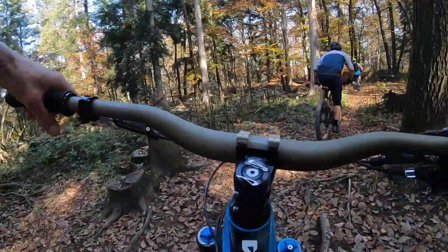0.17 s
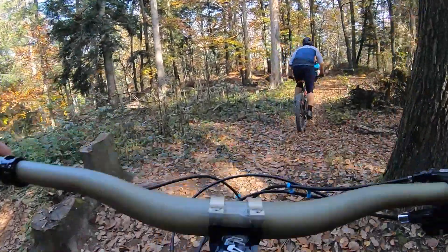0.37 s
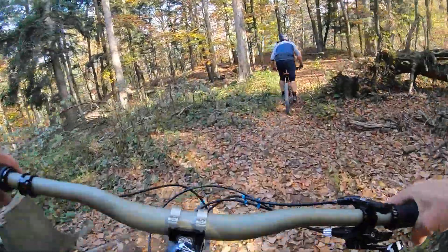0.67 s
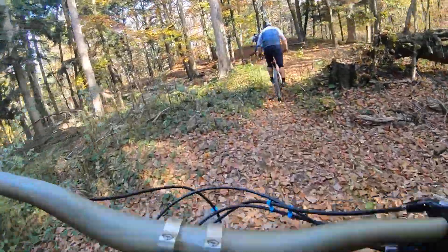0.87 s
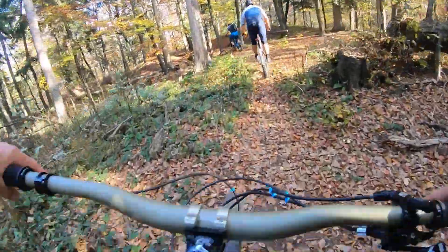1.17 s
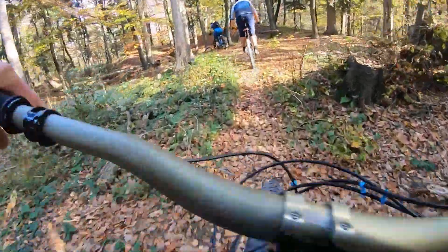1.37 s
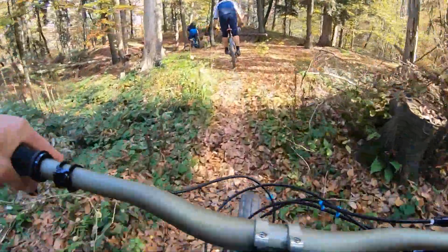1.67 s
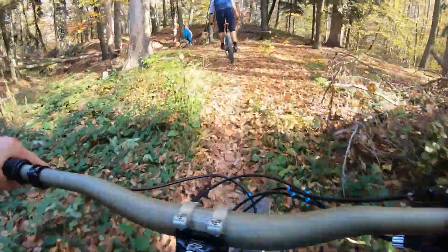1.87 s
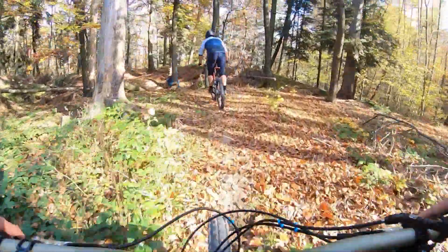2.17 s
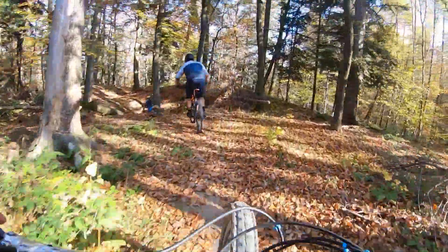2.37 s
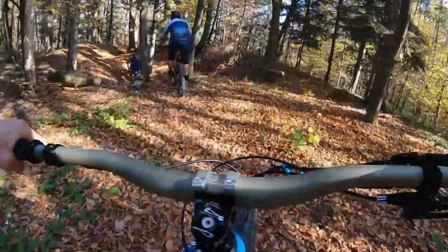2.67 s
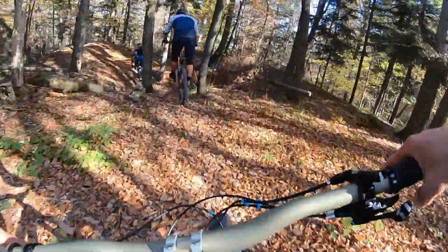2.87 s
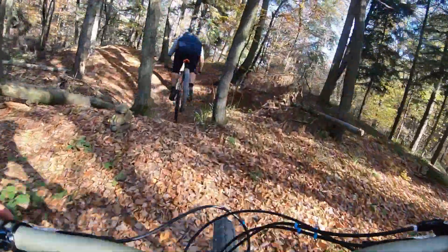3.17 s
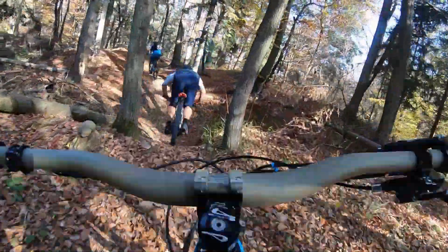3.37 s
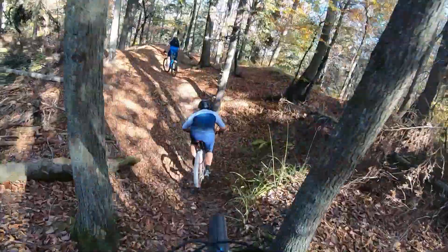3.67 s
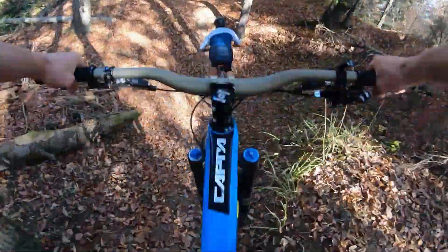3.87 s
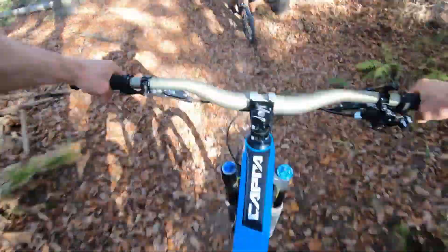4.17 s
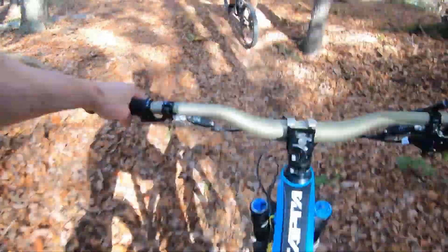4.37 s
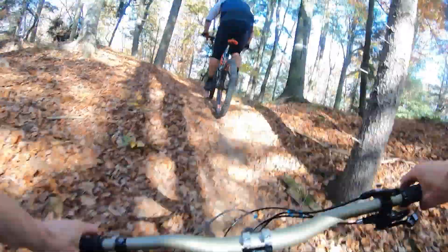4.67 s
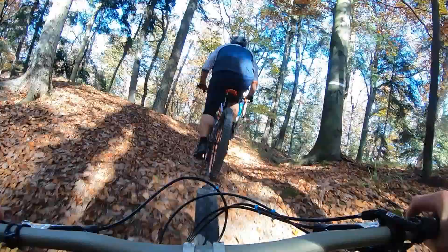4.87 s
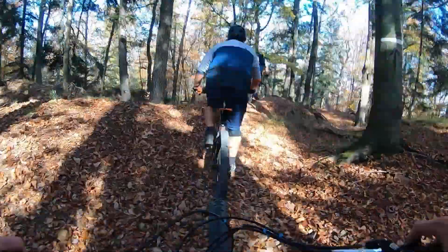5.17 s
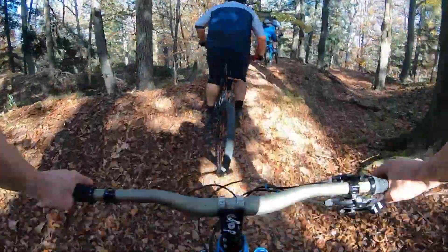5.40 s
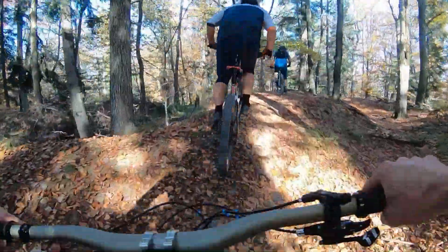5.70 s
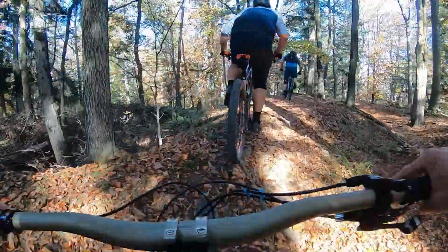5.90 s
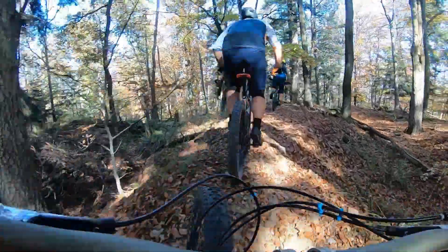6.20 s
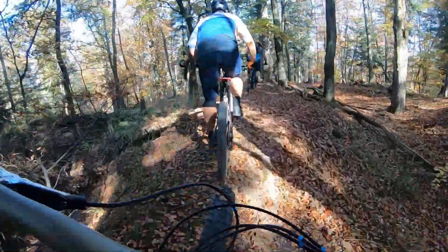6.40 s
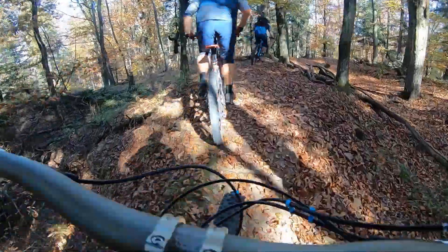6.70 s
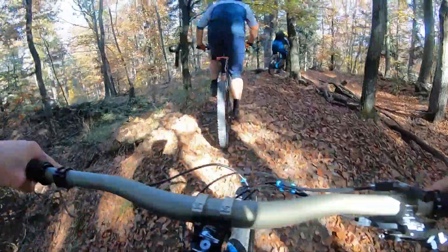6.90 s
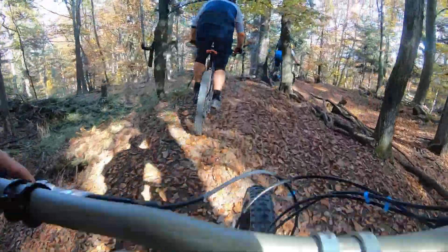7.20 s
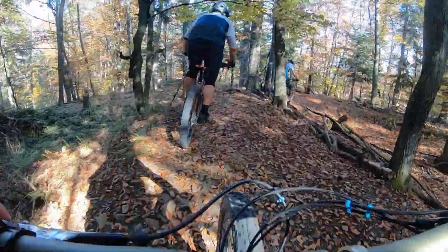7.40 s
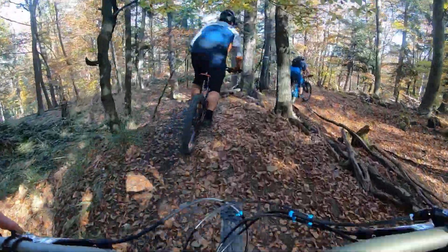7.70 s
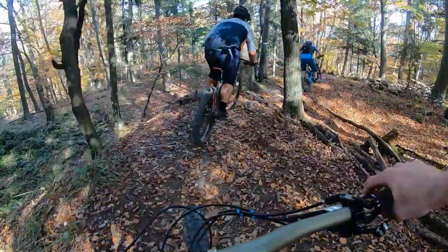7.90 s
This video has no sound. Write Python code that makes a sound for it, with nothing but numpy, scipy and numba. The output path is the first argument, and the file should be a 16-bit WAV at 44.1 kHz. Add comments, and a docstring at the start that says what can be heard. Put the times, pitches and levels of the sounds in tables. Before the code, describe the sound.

Heard close from the rider's chest, a mountain bike rolls slowly through dry forest leaves, crunching in uneven clumps over a low frame rumble. Knocks and metallic clacks come singly. Midway it speeds through a dip while the freewheel buzzes brightly, then the buzz slows into separate ticks. Leaf crunch, thuds and rattles continue uphill, with low wind gusts, and the buzz returns at the very end.

```python
"""Dry leaves crunch under a mountain bike that rolls, coasts through a dip and climbs again, heard at the rider's chest.
Leaves are clumps of tiny noise bursts over a smooth rustle; the frame rumbles and the mount hums under its bumps.
Knocks, steel clacks, scrapes and ringing jolts land one by one. While the pedals rest, pawl drops excite the hub's
resonances into a buzz that ends in single ticks. Wind buffets the two microphone ports as low, gusting noise."""
import sys
import numpy as np
from scipy import signal
from scipy.fft import rfft, irfft, next_fast_len
from scipy.io import wavfile
from scipy.ndimage import uniform_filter1d, map_coordinates
from numba import njit

SR = 44100
rng = np.random.default_rng(int(sys.argv[2]) if len(sys.argv) > 2 else 0)


def store_pcm(level_fs):
    """Save levels as 16-bit WAV."""
    pcm = np.round(np.clip(level_fs, -1, 1) * 32767).astype(np.int16)
    wavfile.write(sys.argv[1], SR, np.atleast_2d(pcm).T)


N = 355005
T = np.arange(N) / SR
CRUISE_M_S = 3  # speed at which the rolling sounds have their base level
MODE_DRIFT = .022  # rms share by which hub and spoke pitches wander

# resonances of hub shell and spokes: f/Hz, width/Hz, level/dB
HUB_MODES = [(1300, 100, 0), (1570, 120, -2), (2170, 220, 6), (2600, 300, -0.5), (3850, 250, -1.5),
             (4440, 170, 0.5), (5950, 200, -2), (7450, 280, -2), (9470, 700, -5)]
# colour of the bare pawl ticks: f/Hz, level/dB
HUB_TONE = [(600, -25), (1200, -44), (2400, 15.5), (4900, 7.5), (6500, 11.5), (9800, 14.5), (11000, 3.5),
            (14000, 2), (16000, -48)]


def amp(db):
    """Decibels to gain."""
    return 10 ** (np.asarray(db) / 20)


def unit(x):
    """Scale to rms 1."""
    return x / np.sqrt(np.mean(x ** 2))


def curves(table):
    """Each column of a table after the first as a curve in time."""
    s, *columns = np.transpose(table)
    return [np.interp(T, s, column) for column in columns]


def tint(x, spectrum):
    """Colour a sound with (f/Hz, level/dB) points, joined along log frequency."""
    hz, db = np.transpose(spectrum)
    size = next_fast_len(x.shape[-1])
    f = np.maximum(np.arange(size // 2 + 1) * SR / size, 1)
    gain = amp(np.interp(np.log(f), np.log(hz), db))
    return irfft(rfft(x, size) * gain, size)[..., :x.shape[-1]]


def resonate(x, hz, width):
    """One resonance, gain 1 at its centre."""
    b, a = signal.iirpeak(min(hz, SR / 2 - 1), hz / width, fs=SR)
    return signal.lfilter(b, a, x)


def ring(x, modes):
    """A body as parallel resonances of (f/Hz, width/Hz, level/dB)."""
    return sum(amp(db) * resonate(x, hz, width) for hz, width, db in modes)


@njit
def sweep(x, hz, width):
    """One resonance whose centre moves, gain 1 at the centre."""
    y, band, low = np.empty(len(x)), 0., 0.
    for i in range(len(x)):
        g, k = np.tan(np.pi * hz[i] / SR), width / hz[i]
        v = (band + g * (x[i] - low)) / (1 + g * (g + k))
        band, low, y[i] = 2 * v - band, low + 2 * g * v, k * v
    return y


def walk(rate):
    """Random curve of rms 1 that heads for a new value rate times a second."""
    steps = np.cumsum(np.full(N, rate / SR))
    return unit(map_coordinates(rng.standard_normal(4096), [steps], order=1, mode="wrap"))


def swells(events, attack_s, release_s):
    """Events of (t/s, length/s, sizes) rise, hold and fall; one curve for each kind of size."""
    total = 0
    for s, length, *sizes in events:
        corners = [s - attack_s, s, s + length, s + length + release_s]
        total = total + np.outer(sizes, np.interp(T, corners, [0, 1, 1, 0]))
    return total


def doublings(speed):
    """How many times the speed has doubled from cruising."""
    return np.log2(speed / CRUISE_M_S)


def ports(pair):
    """Two unrelated sounds as mid and side at the two ports, narrow in the bass."""
    # stereo width: f/Hz, side minus mid/dB
    side_width = [(100, -43), (350, -19), (700, -3), (1200, -1), (2400, -9.5), (4400, -9), (8000, 0),
                  (15000, 0)]
    side = tint(pair[1], side_width)
    return np.array([pair[0] + side, pair[0] - side])


def pan(db):
    """Left and right gains for a left minus right level in dB."""
    return amp(np.array([db, -db]).reshape(2, -1) / 2)


def add(out, s, sound):
    """Mix a short sound in at time s."""
    i = max(int(s * SR), 0)
    out[:, i:i + sound.shape[1]] += sound[:, :N - i]


def crackle(rate, spread_db, t60, low_hz, high_hz, width_share, patchy_db, count=12):
    """Tiny fractures, most faint and a few strong; each of count bands has its own bursts and flurries."""
    out, n = 0, int(rate * N / SR / count)
    for hz in np.geomspace(low_hz, high_hz, count):
        at = rng.integers(0, N, n)
        flurry_db = patchy_db * np.interp(at, np.linspace(0, N, 160), rng.standard_normal(160))
        sizes = amp(np.minimum(spread_db * rng.exponential(size=n) + flurry_db, 13))
        hits = np.bincount(at, sizes ** 2, N) + 1e-18
        # each hit's power falls by 60 dB in t60 seconds
        power = signal.lfilter([1], [1, -np.exp(-2 * np.log(1000) / t60 / SR)], hits)
        bursts = np.sqrt(power) * rng.standard_normal((2, N))
        out = out + resonate(bursts, hz, hz * width_share)
    return unit(out)


def wind(speed):
    """Eddies buffet each port on its own; stronger gusts shed finer eddies."""
    # gusts hitting the ports: t/s, length/s, level above the steady airflow/dB, added left minus right/dB
    gusts = [(0, 0.039, 12.5, -3), (1.05, 0.11, 7, 4), (1.42, 0.3, 12, 1), (1.86, 0.23, 8, 5),
             (2.33, 0.32, 10, 0), (3.02, 0.092, 12, 1), (3.52, 0.45, 6.5, -3.5), (4.2, 0.61, 5.5, -1),
             (4.95, 0.25, 7, -1.5), (5.26, 0.053, 5.5, -3.5), (6.33, 0.22, 4, -4.5), (7.22, 0.19, 4.5, 7),
             (7.47, 0.17, 4, -8.5), (7.93, 0.069, 10, -7.5)]
    # colour of the steady buffeting: f/Hz, level/dB
    wind_tone = [(15, 8.5), (30, 2.5), (60, 6), (110, 1.5), (150, -5.5), (250, -21), (500, -39),
                 (1500, -57)]
    # colour of the fine eddies: f/Hz, level/dB
    gust_tone = [(60, -32), (150, -2), (260, -1), (450, -11), (900, -26.5), (2500, -82)]
    gust_db, push_db = swells(gusts, attack_s=0.13, release_s=0.11)
    level_db = -22.5 + 6 * doublings(speed) + gust_db
    eddies = rng.standard_normal((2, N)) * amp(3.23 * np.array([walk(24), walk(24)]))
    buffet = unit(tint(eddies, wind_tone)) * amp(level_db)
    flutter = unit(tint(eddies, gust_tone)) * amp(1.45 * level_db - 10)  # gains more than the buffet in a gust
    return (buffet + flutter) * pan(-2 + push_db)


def rumble(speed, rough_db):
    """Level of the ground's shaking in dB: more with speed and in ruts, and always a little lumpy."""
    # wheels judder over rough patches: t/s, length/s, level above the rolling rumble/dB
    ruts = [(1.56, 0.043, 9), (2.05, 0.19, 6), (3.6, 0.071, 3.5), (5.65, 0.017, 7.5), (6.34, 0.025, 5),
            (7.47, 0.06, 4), (7.97, 0.048, 4)]
    rut_db, = swells(ruts, attack_s=0.023, release_s=0.007)
    lumps_db = 1 * walk(18)
    return -30 + 11.5 * doublings(speed) + rough_db + rut_db + lumps_db


def frame(level_db):
    """Small bumps thud through tyres and frame and rock the camera mount."""
    # colour of the thuds: f/Hz, level/dB
    frame_tone = [(60, 8.5), (130, -2), (230, 0), (320, -4), (450, -7), (620, -9.5), (900, -28),
                  (2000, -46), (5000, -63)]
    bumps = crackle(rate=380, spread_db=2.1, t60=0.014, low_hz=100, high_hz=900,
                    width_share=.8, patchy_db=1.5, count=4)
    bumps = bumps + amp(-20) * rng.standard_normal((2, N))
    thuds = unit(ports(unit(tint(bumps, frame_tone)))) * amp(level_db)
    mount_hz = 233.3 * (1 + .05 * walk(5.6))  # the strap tightens and slackens
    mount = unit(sweep(bumps[0], mount_hz, 27.)) * amp(0.8 * level_db - 15.5)
    return (thuds + mount) * pan(-3.2)


def jolts():
    """Jolts set the mount, the housing or a spoke ringing as decaying sines."""
    # jolts: t/s, f/Hz, level at the left port/dB, decay/s, share and sign of the swing at the right port
    hits = [(3.919, 1293, 6.5, 0.0054, -0.62), (5.055, 1320, -17, 0.013, 0.13),
            (5.088, 1280, -23.5, 0.022, 0.24), (6.822, 256, -20, 0.03, 1), (6.992, 239.5, -11, 0.023, 0.96)]
    out, t = np.zeros((2, N)), T[:8192]
    for s, hz, db, decay_s, right in hits:
        tone = np.sin(2 * np.pi * hz * t) * (1 - np.exp(-t / 0.00092)) * np.exp(-t / decay_s)
        add(out, s, amp(db) * tone * np.array([[1], [right]]))
    return out


def scrapes():
    """Rubbing surfaces catch and slip unevenly in one resonance."""
    # scrapes of grip, tyre and brake pad: t/s, length/s, level/dB, f/Hz, width/Hz, left minus right/dB
    rubs = [(0.002, 0.026, -25.5, 1760, 1200, 8), (0.696, 0.018, -39, 8300, 1800, -12),
            (1, 0.045, -31, 1500, 2000, 3), (1.15, 0.05, -32, 550, 497, 0),
            (4.246, 0.035, -21, 2250, 1200, 2), (4.319, 0.055, -23.5, 7440, 1396, -4),
            (5.012, 0.012, -23.5, 2500, 350, 2), (6.738, 0.033, -25.5, 1000, 1200, -1)]
    edge_s = 0.005
    out, t = np.zeros((2, N)), T[:8192]
    for s, length, db, hz, width, pan_db in rubs:
        slips = rng.standard_normal((2, len(t))) * (rng.random(len(t)) < 2500 / SR)  # about 2500 a second
        rub = unit(ports(resonate(resonate(slips, hz, width), hz, width)))
        contact = np.interp(t, [0, edge_s, length, length + edge_s], [0, 1, 1, 0])
        add(out, s, rub * contact * amp(db) * pan(pan_db))
    return out


def knocks():
    """A root thumps through the tyre while the wood gives one sharp crack and a short splintering tail."""
    # roots, twigs and knocks: t/s, thump level before trim/dB, thump f/Hz, snap level before trim/dB, snap f/Hz
    impacts = [(0.0015, -22, 394, -10.5, 1500), (0.0202, -26, 650, -17, 850),
               (0.0298, -36, 800, -19.5, 960), (0.3114, -30, 500, -23, 1400), (0.465, -26, 250, -38, 900),
               (0.555, -31, 460, -33, 1000), (0.981, -21, 300, -25, 900), (0.9911, -11.5, 376, -14.5, 1100),
               (1.114, -24, 610, -31, 1000), (1.161, -20, 420, -31, 800), (1.187, -18.5, 333, -43, 900),
               (1.333, -16.5, 187, -28, 1000), (1.963, -54, 450, -23, 2230), (2.046, -16.5, 250, -26, 1200),
               (2.091, -20, 307, -26, 1300), (2.135, -16.5, 316, -17, 1400),
               (2.4796, -24, 420, -15.5, 1660), (2.625, -20, 400, -17, 1400), (2.7943, -20, 474, -15, 2260),
               (2.9245, -8.5, 257, -23, 800), (3.2483, -20, 330, -26, 1400), (3.573, -21, 305, -23, 900),
               (4.181, -17, 393, -37, 1400), (4.225, -30, 328, -7.5, 1710), (4.2289, -33, 400, -8, 2410),
               (4.2426, -38, 410, -5, 2020), (4.261, -12.5, 190, -20, 2900), (4.633, -14, 332, -16, 900),
               (4.661, -8, 240, -14, 2000), (4.717, -15, 450, -22, 993), (4.826, -20, 645, -13, 1053),
               (4.864, -13.5, 280, -25, 1100), (4.92, -21, 315, -23, 800), (5.7058, -40, 500, -13, 1480),
               (6.1516, -21.5, 404, -12, 1630), (6.338, -17, 267, -23, 1500), (6.565, -18, 153, -44, 1200),
               (6.7415, -20, 453, -23, 1200), (6.758, -20, 500, -27, 1300), (6.846, -37, 400, -22, 1700),
               (6.992, -23, 600, -16, 900), (7.033, -15, 710, -20, 1100), (7.1198, -20, 503, -14, 1600),
               (7.46, -27, 323, -18, 1400), (7.824, -19, 366, -20, 1793)]
    thump_trim_db, snap_trim_db = 5.5, 8.0
    out, t = np.zeros((2, N)), T[:4096]
    crack_s, side_lag_s = .001, .00015
    crack = np.array([np.sinc((t - at) * SR) for at in (crack_s, crack_s + side_lag_s)])
    wood = signal.butter(4, 3400, fs=SR, output="sos")  # dulls the snap
    for s, thump_db, hz, snap_db, snap_hz in impacts:
        thump = np.sin(2 * np.pi * hz * t) * hz * t * np.exp(-hz * t / 0.37)  # swells and dies in about two cycles
        splinters = amp(-26) * rng.standard_normal((2, len(t)))
        blow = ports(crack + splinters) * np.exp(-t / .007)
        width = 1.4 * snap_hz
        snap = signal.sosfilt(wood, resonate(resonate(blow, snap_hz, width), snap_hz, width))
        thump = thump / np.abs(thump).max() * amp(thump_db + thump_trim_db)
        snap = snap / np.abs(snap).max() * amp(snap_db + snap_trim_db)
        add(out, s, thump + snap)
    return out


def clacks():
    """Steel meets steel in a few milliseconds of chatter, with a faint ring after it."""
    # chain and levers: t/s, level before trim/dB, 1-3.5 kHz body level before trim/dB, left minus right/dB
    strikes = [(0.0204, -10, -13, -11), (0.026, -12, -15, -17), (0.2397, -13.5, -11, 2),
               (0.6643, -27.5, 7, 5), (0.911, -1, -11, 5), (1.0562, -1.5, -11, 2), (3.919, -19.5, -9, -33),
               (5.054, -7, 0.5, 7), (5.085, -0.5, -4.5, 4), (6.6248, -5, -2.5, 4), (6.712, -1.5, -11, 0),
               (6.7422, -7, -1.5, 2), (6.768, -3, -7.5, 1.0), (6.8443, -3, -7, 4.5), (6.889, -9, -24, -1),
               (7.1745, -15, -1, -1)]
    # resonances of the steel parts: f/Hz, width/Hz, level/dB
    steel_modes = [(5000, 84, 14), (5720, 1130, 9.5), (7460, 47, 9), (8160, 220, 3), (9400, 520, -12),
                   (14500, 1100, -4.5)]
    level_trim_db, body_trim_db = -5.0, 5.0
    out, t = np.zeros((2, N)), T[:4096]
    chatter = np.exp(-(t / .0036) ** 4) + amp(-15) * np.exp(-t / .007)
    for s, level_db, body_db, pan_db in strikes:
        contacts = rng.standard_normal((2, len(t))) * chatter
        steel = unit(resonate(ring(contacts, steel_modes), 7500, 5900))
        body = unit(resonate(resonate(contacts, 3630, 2100), 1500, 1500))
        clack = ports(steel + amp(body_db + body_trim_db) * body) / np.abs(steel[0]).max()
        add(out, s, clack * amp(level_db + level_trim_db) * pan(pan_db))
    return out


def pawl_ticks(count=14):
    """As the cranks catch up, pawl drops tick one by one, slightly quickening, and leave a spoke ringing."""
    # ringing spoke; the pitch glides up as the next one takes the load: t/s, f/Hz
    spoke_pitch = [(5.28, 1310), (5.37, 1580)]
    start_s, gap_s, quicken_s = 5.151, .0405, .001
    k = np.arange(count)
    tick_s = start_s + k * gap_s - quicken_s * k ** 2 / 2
    drops = np.zeros(N)
    drops[(tick_s * SR).astype(int)] = amp(rng.standard_normal(count))
    contacts = signal.oaconvolve(drops, np.exp(-T[:1024] / .0022))[:N] * rng.standard_normal((2, N))
    ticks = ports(ring(contacts, HUB_MODES) + amp(-8) * tint(contacts, HUB_TONE))
    hz = curves(spoke_pitch)[0] * (1 + MODE_DRIFT * walk(30))
    pulses, width_hz = drops + 1e-18, 100.
    overtone = sweep(pulses, 2.76 * hz, width_hz)
    spoke = sweep(pulses, hz, width_hz) + amp(-6) * overtone
    return (amp(-27.5) * ticks + amp(-19.5) * spoke / np.abs(spoke).max()) * pan(2.7)


def freehub(speed):
    """Pawls drop over the ratchet teeth; each drop rattles the hub shell and spokes."""
    # resting pedals: t/s, length/s, level at cruising speed before trim/dB, fade by the end/dB
    coasts = [(3.509, 0.75, -25.5, 3), (4.003, 1.43, -29, -5), (7.867, 0.64, -23.5, 11)]
    pawls_per_m, release_s, trim_db = 38, 0.39, -2.0
    catch_up = 0.5  # share of the wheel's speed that the cranks regain by the end of a coast
    gain, slip = 0, 1
    for s, length, db, fade_db in coasts:
        progress = np.clip((T - s) / length, 0, 1)
        coasting = np.interp(T, [s, s + 0.0063, s + length - release_s, s + length], [0, 1, 1, 0])
        gain = gain + coasting * amp(db - fade_db * progress ** 2)
        slip = np.where(T > s, 1 - catch_up * progress ** 6, slip)
    rate = pawls_per_m * speed * slip
    turns = np.cumsum(rate * (1 + 0.022 * walk(40))) / SR  # pawl drops so far
    since_drop_s = turns % 1 / rate
    drops = np.exp(-since_drop_s / .004) + .4
    drops = drops / np.sqrt(uniform_filter1d(drops ** 2, size=2048))  # even loudness at any rate
    rattle, shell = drops * rng.standard_normal((2, N)), 0
    for hz, width, db in HUB_MODES:  # the turning wheel shifts each mode and shows it more or less
        centre = hz * (1 + MODE_DRIFT * walk(7))
        mode = np.array([sweep(side, centre, float(width)) for side in rattle])
        shell = shell + mode * amp(db + 2.5 * walk(8))
    ticks = unit(tint(drops * rng.standard_normal((2, N)), HUB_TONE))
    buzz = unit(ports(unit(shell) + amp(-2.5) * ticks))
    return buzz * gain * amp(9 * doublings(speed) + trim_db) * pan(3.4)


def leaves(speed, bright_db):
    """Dry leaves break in clumps under the knobs; the finest pieces merge into a smooth rustle."""
    # a tyre bites into a heap of leaves: t/s, length/s, level above the rolling rustle/dB
    crunches = [(0.71, 0.009, 3.5), (1.01, 0.072, 3.5), (1.15, 0.062, 4), (1.54, 0.12, 5.5),
                (1.82, 0.0072, 6), (1.96, 0.043, 2.5), (2.12, 0.015, 5), (2.21, 0.016, 6.5),
                (2.44, 0.016, 3), (2.55, 0.0043, 4), (2.78, 0.028, 7), (2.975, 0.029, 4.5),
                (3.08, 0.015, 3.5), (3.31, 0.02, 3), (3.52, 0.13, 4), (5.59, 0.071, 4), (5.88, 0.036, 2.5),
                (6.15, 0.13, 2), (6.32, 0.18, 4), (6.75, 0.11, 3.5), (7, 0.065, 3.5), (7.41, 0.09, 0.5),
                (7.97, 0.073, 1.5)]
    # colour of the breaking leaves: f/Hz, level/dB
    leaf_tone = [(200, -24), (500, -5), (850, -1), (1100, -5.5), (1450, -0.5), (2100, -0.5), (2600, 1.5),
                 (3400, -1.5), (4700, -5), (6500, -3.5), (8300, -8), (9900, -10.5), (11000, -17),
                 (13000, -16), (15500, -16)]
    crunch_db, = swells(crunches, attack_s=.025, release_s=.04)
    level_db = -30 + 10 * doublings(speed) + crunch_db
    grains = crackle(rate=2800, spread_db=2.8, t60=.024, low_hz=700, high_hz=10000,
                     width_share=.3, patchy_db=3, count=16)
    rustle = amp(-3) * rng.standard_normal((2, N))
    clumps = (grains + rustle) * amp(1.1 * walk(18))
    crunch = unit(ports(tint(clumps, leaf_tone)))
    treble = signal.sosfiltfilt(signal.butter(2, 4200, "high", fs=SR, output="sos"), crunch)
    flicker_db = 1.3 * walk(20)
    # harder crushing breaks finer pieces: more treble for each dB of crunch
    tilt = amp(bright_db + 0.15 * crunch_db + 4.0 + flicker_db)
    tilted = (crunch + (tilt - 1) * treble) / np.sqrt(0.56 + 0.5 * tilt ** 2)  # offsets the tilt's loudness
    return tilted * amp(level_db) * pan(1.75)


def scene():
    """Everything that rides along with the camera; speed drives leaves, rumble, freehub and wind."""
    # slow start, dip and far side: t/s, speed/(m/s), leaf brightness before offsets/dB, ground roughness/dB
    ride = [(0, 2.07, -10, 2), (0.45, 1.66, -9.5, -1), (0.8, 2.03, -8.5, 1), (1.42, 2.12, -5, 4.5),
            (2.1, 3.24, -5, -4), (2.55, 2.87, -7, 6.5), (3.28, 3.24, -3.5, -3.5), (3.55, 3.66, -3, 5),
            (3.92, 2.6, -5, 3.5), (4.15, 4.48, -26, 2.5), (4.4, 5.4, -5, -2), (4.75, 5.18, -4, 5),
            (5.1, 3.13, -1, -3.5), (5.36, 2.41, -5.5, -5), (5.7, 3.59, -1, -1.5), (6.6, 3, -5, -1),
            (7.2, 3.52, -7, 4), (8.05, 3, -3, -3)]
    speed, bright_db, rough_db = curves(ride)
    hub = freehub(speed) + pawl_ticks()
    blows = clacks() + knocks() + scrapes() + jolts()
    return wind(speed) + frame(rumble(speed, rough_db)) + blows + hub + leaves(speed, bright_db)


def record(dry):
    """The housing dulls the top, the camera clips at full scale and cuts the highest treble."""
    # what the housing and microphones let through: f/Hz, level/dB
    housing = [(10, -24), (25, 0), (10000, 0), (11500, -3), (14500, -7.5), (16000, -22)]
    clipped = np.clip(tint(dry, housing), -1, 1)
    top_cut = signal.ellip(8, .2, 70, 15300, fs=SR, output="sos")
    return signal.sosfilt(top_cut, clipped)


dry = scene()
out = record(dry)
store_pcm(out)
```